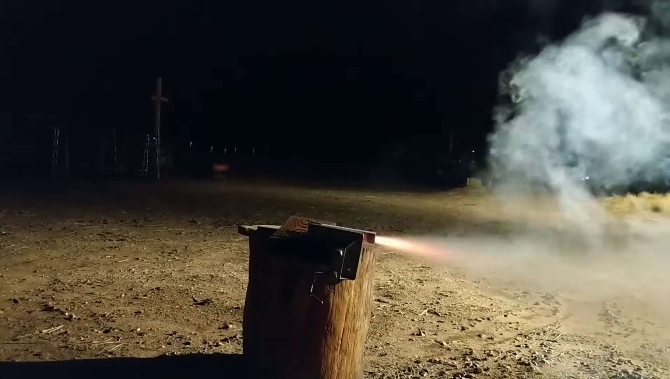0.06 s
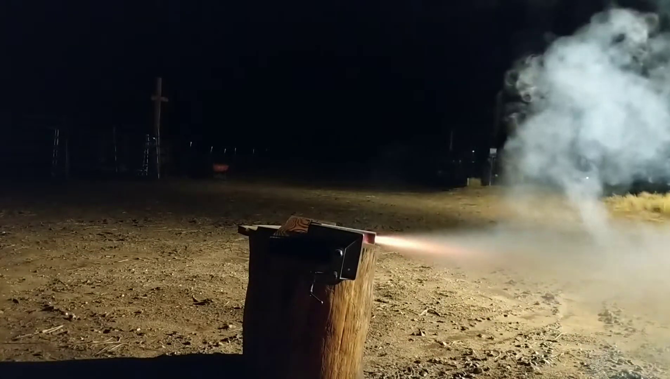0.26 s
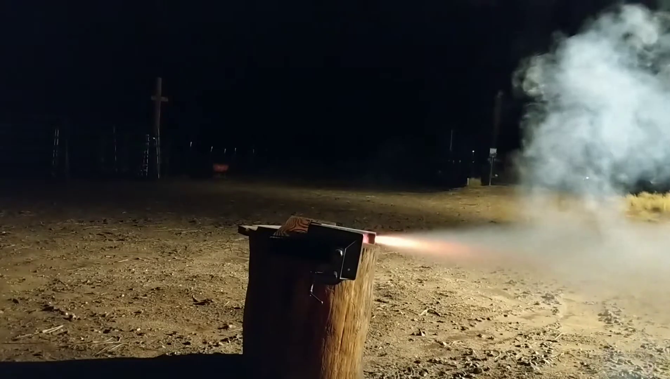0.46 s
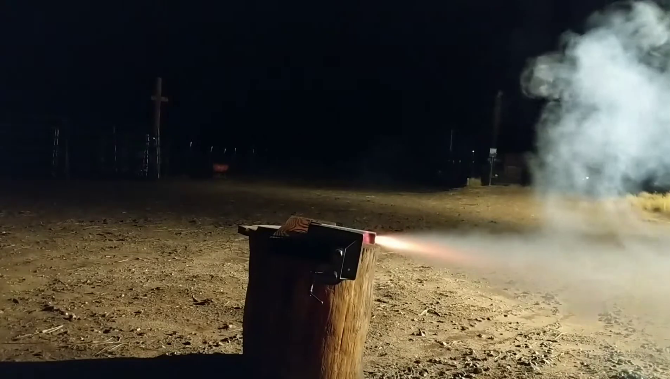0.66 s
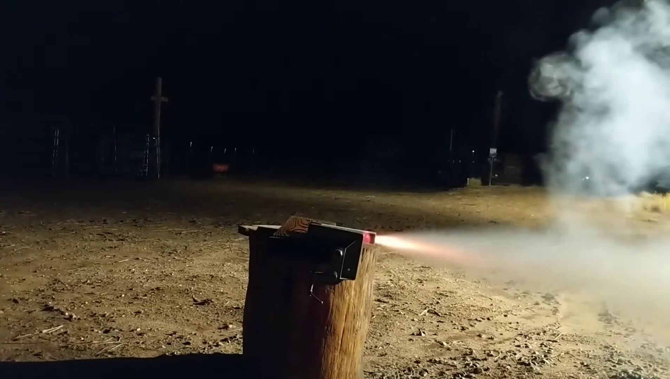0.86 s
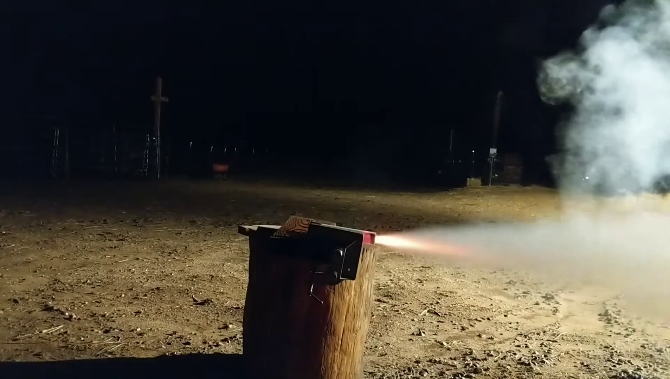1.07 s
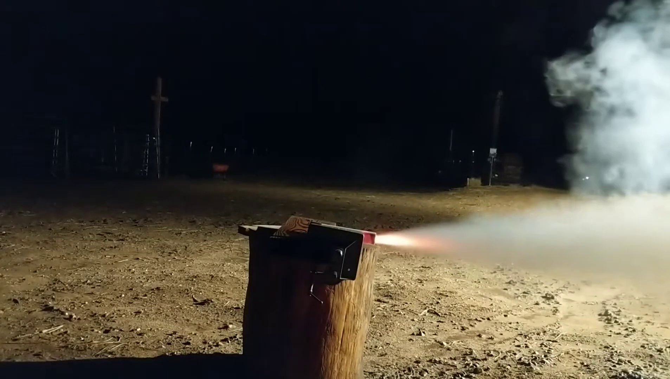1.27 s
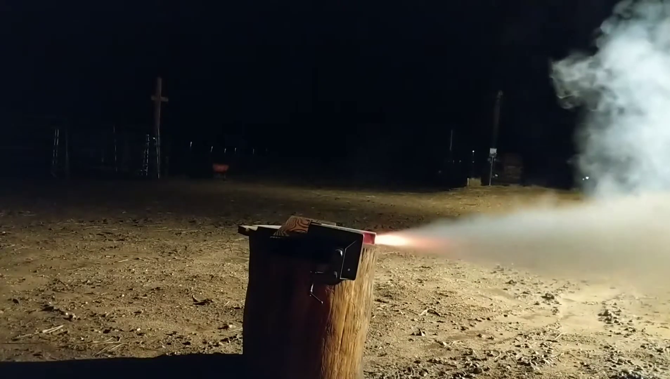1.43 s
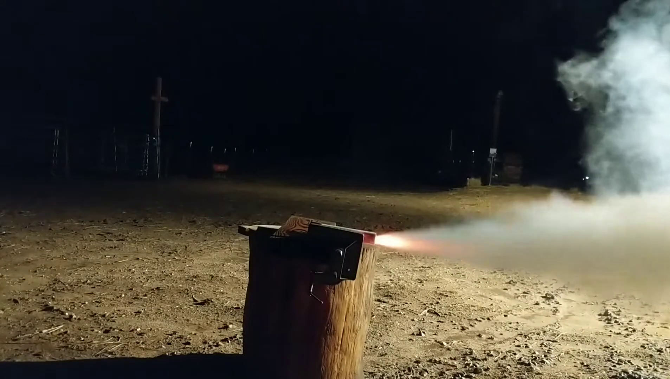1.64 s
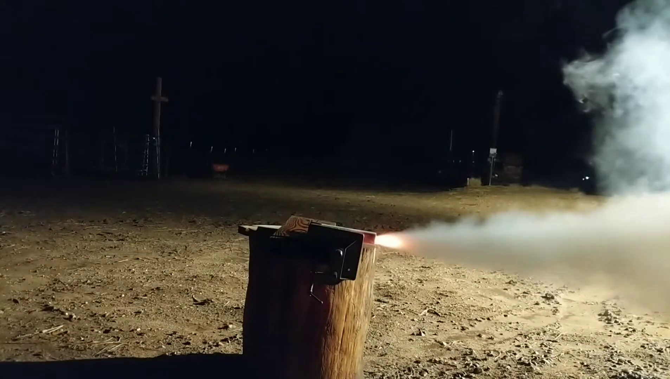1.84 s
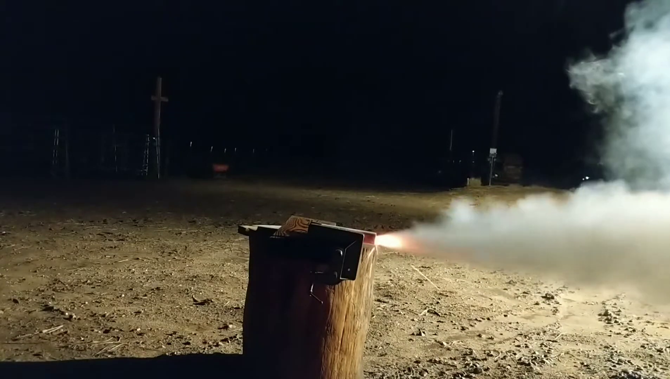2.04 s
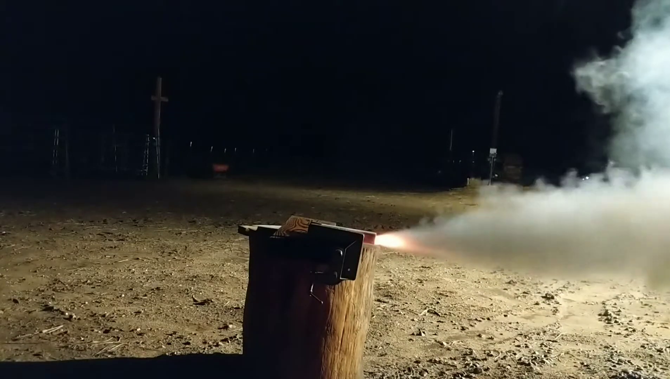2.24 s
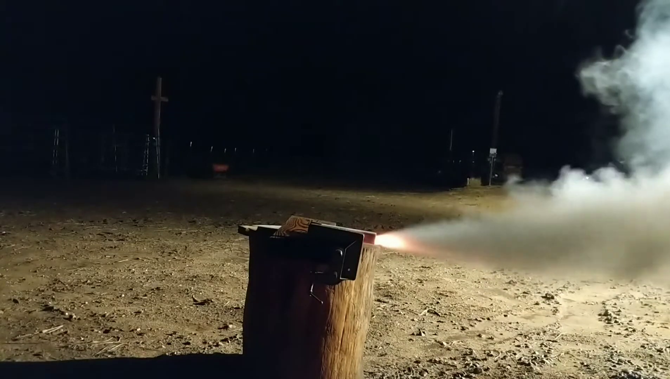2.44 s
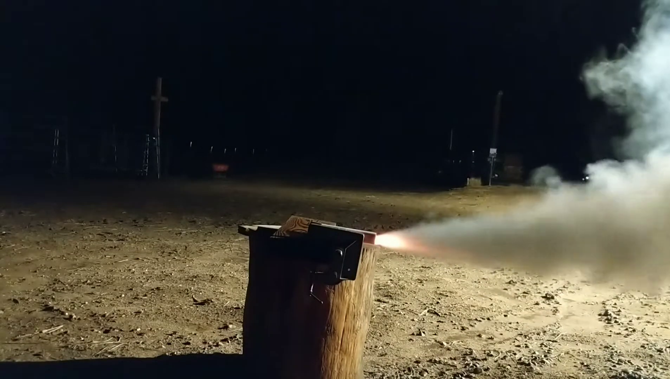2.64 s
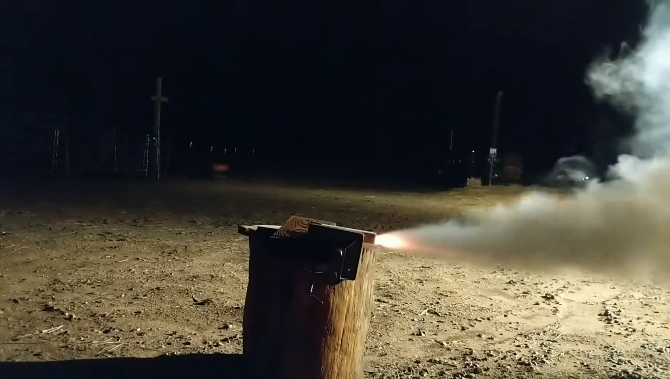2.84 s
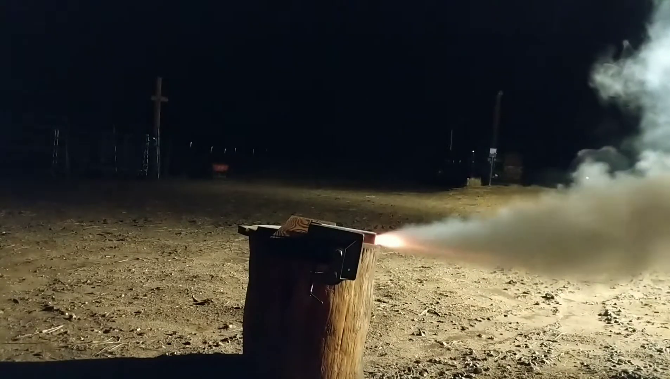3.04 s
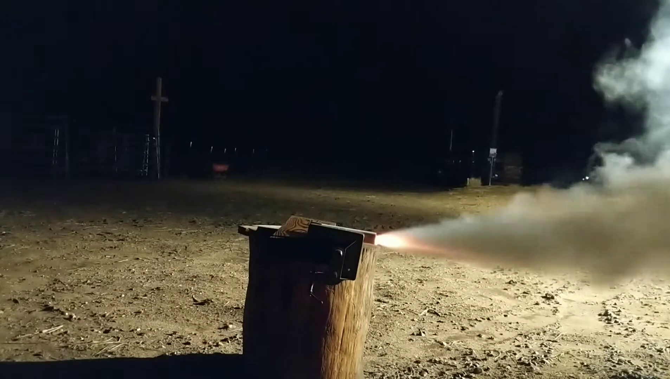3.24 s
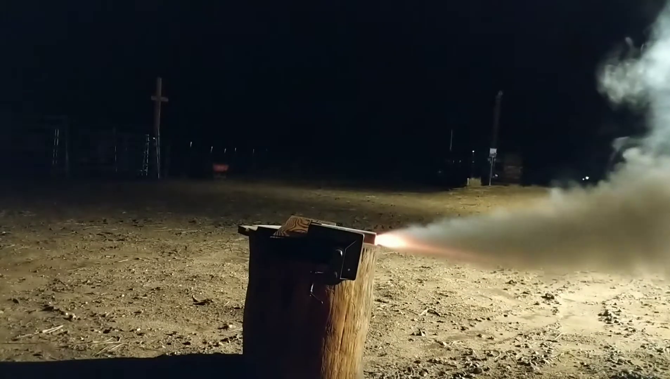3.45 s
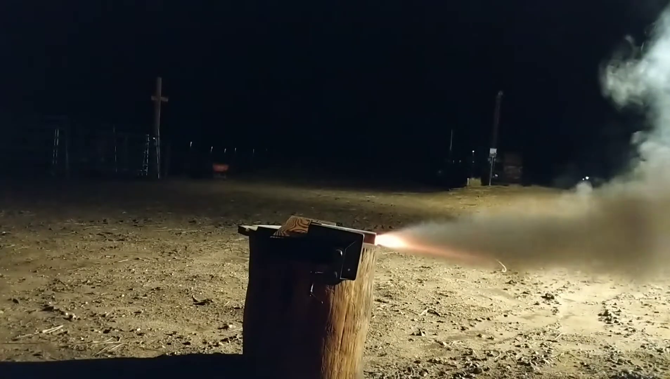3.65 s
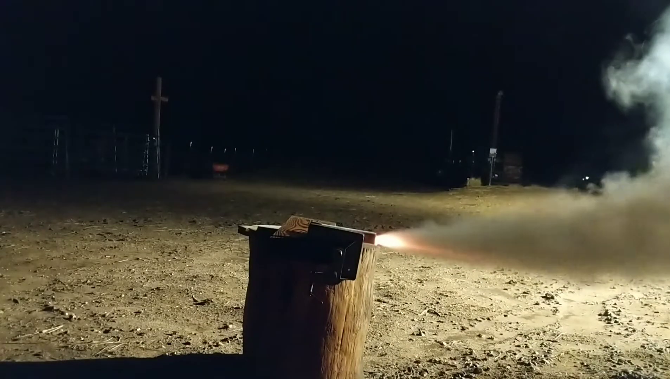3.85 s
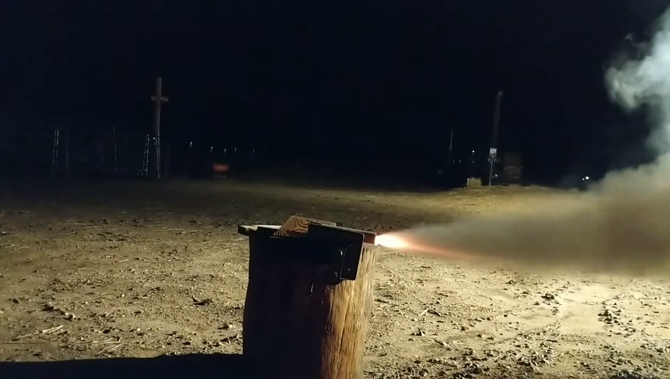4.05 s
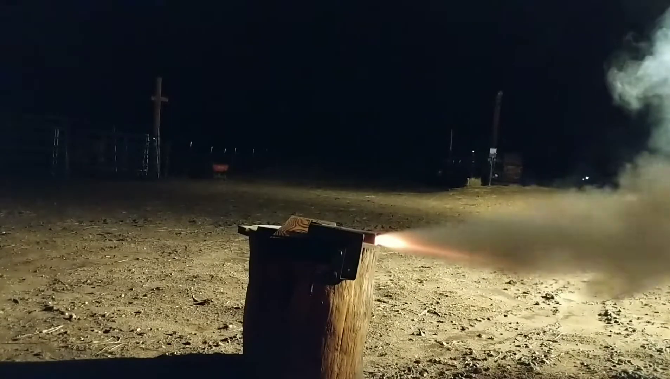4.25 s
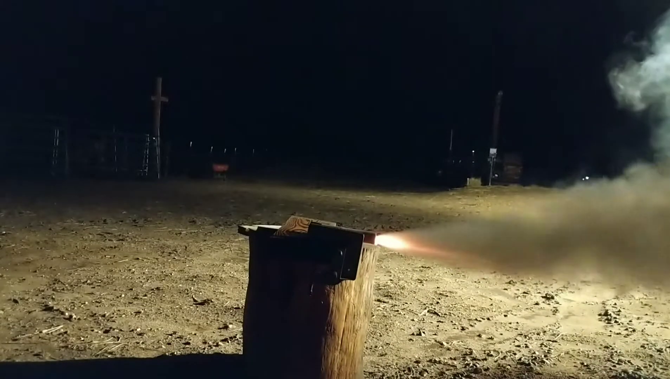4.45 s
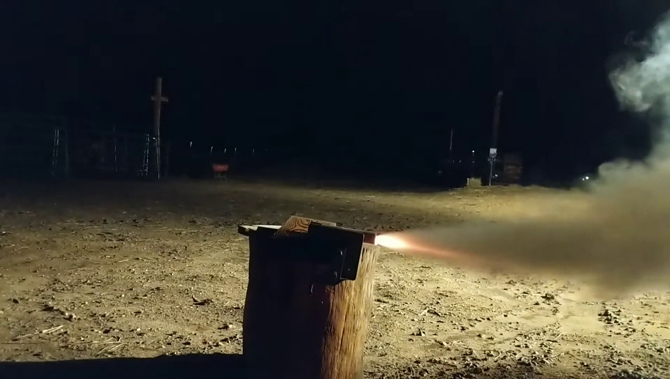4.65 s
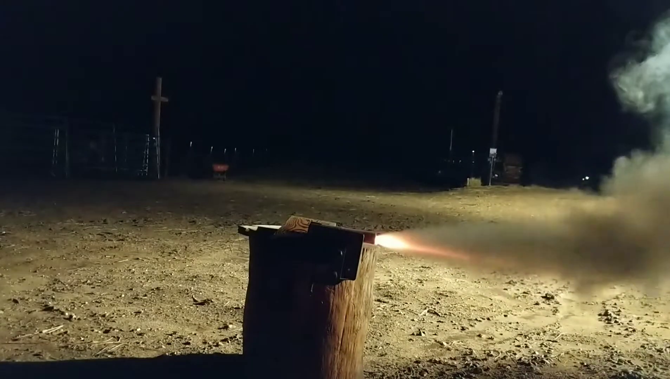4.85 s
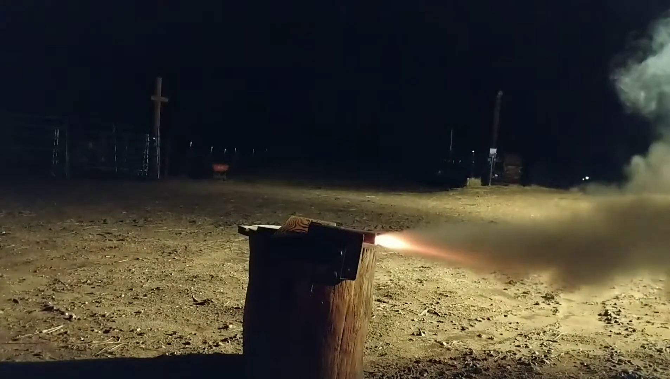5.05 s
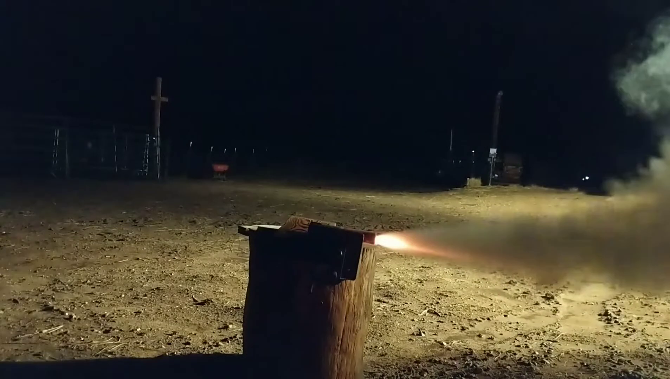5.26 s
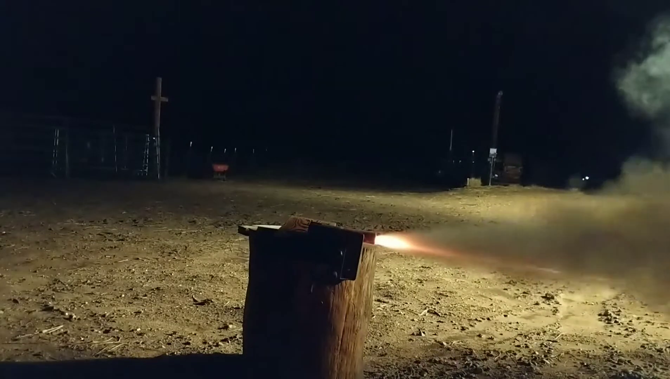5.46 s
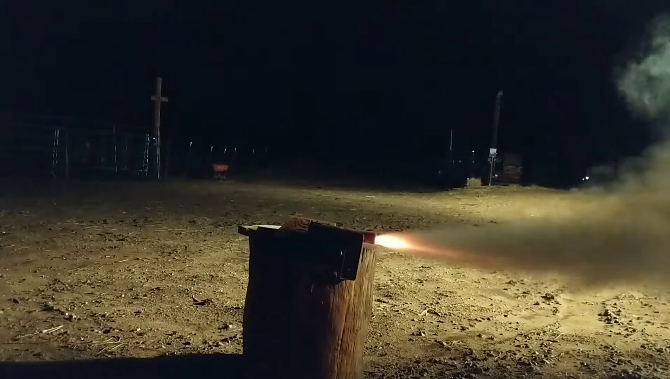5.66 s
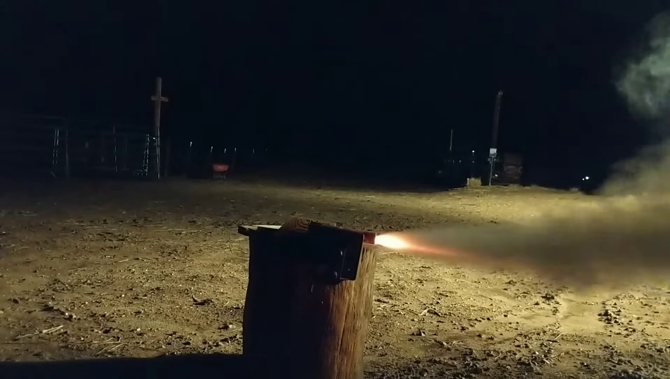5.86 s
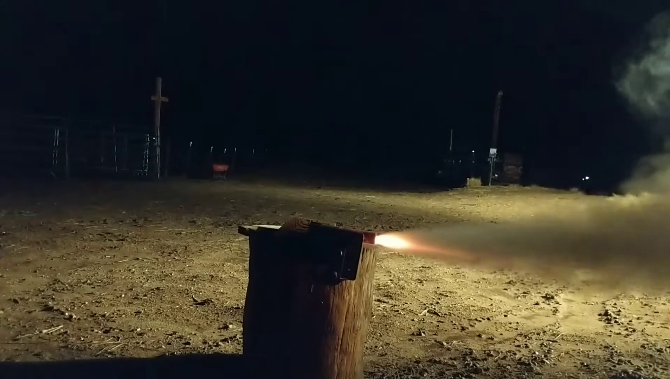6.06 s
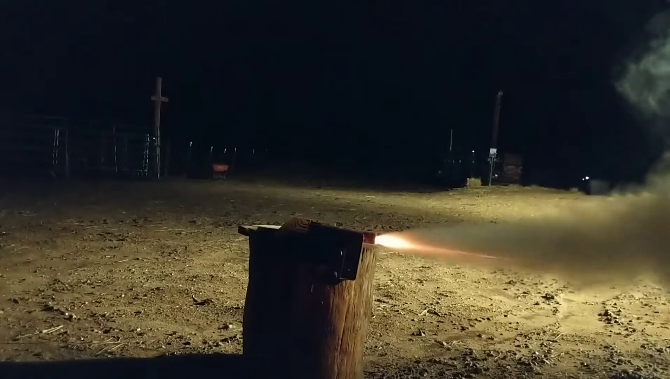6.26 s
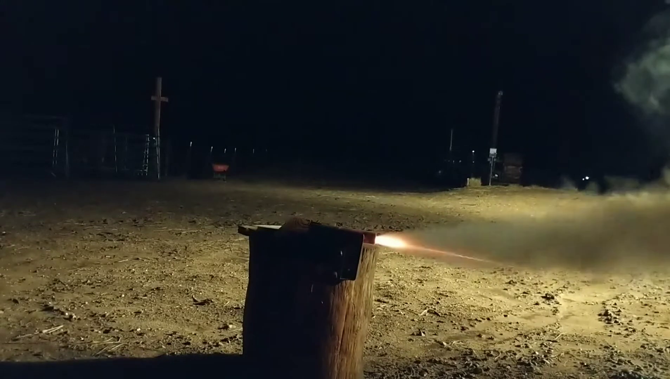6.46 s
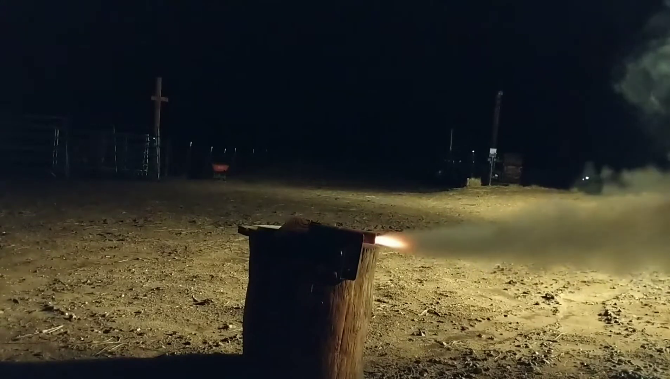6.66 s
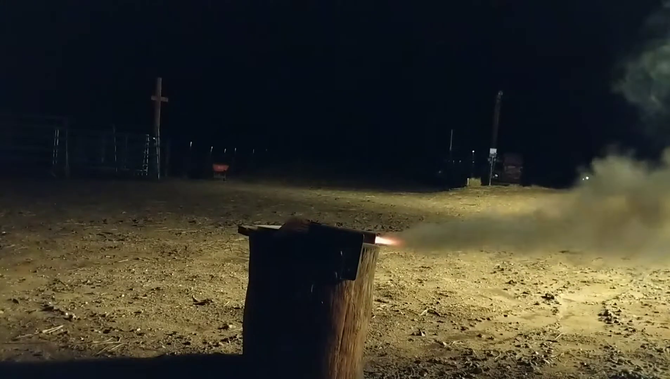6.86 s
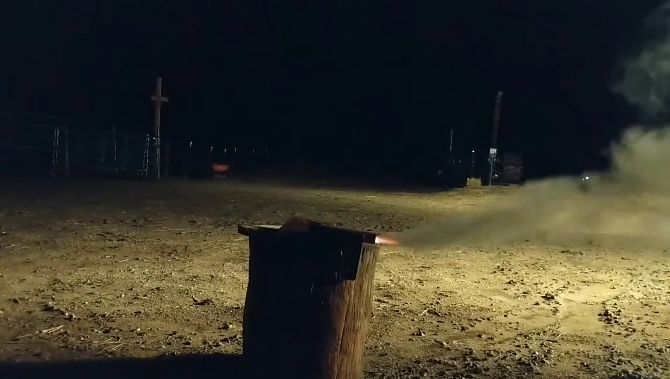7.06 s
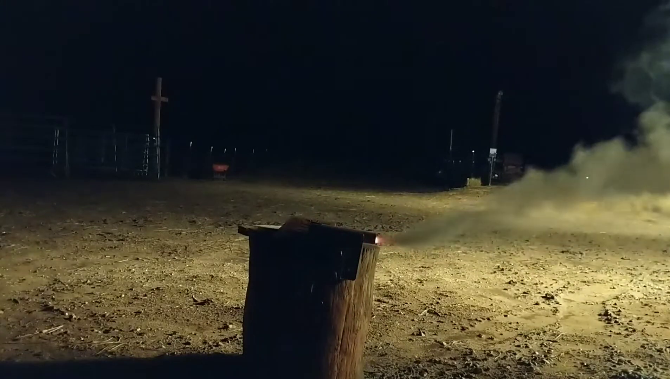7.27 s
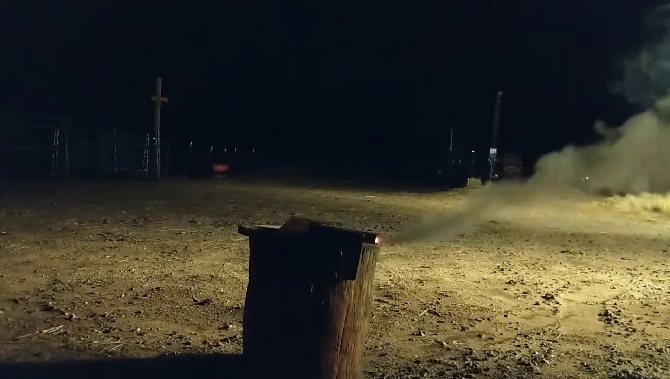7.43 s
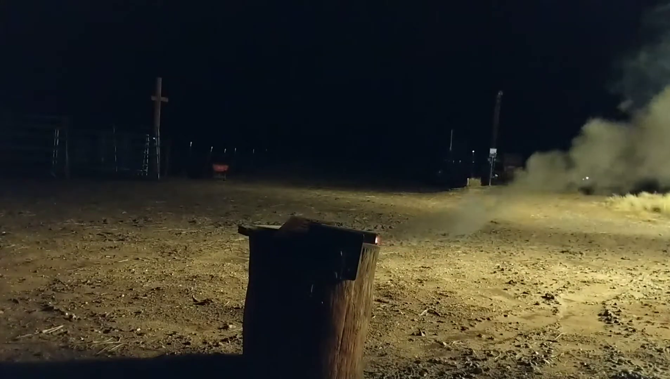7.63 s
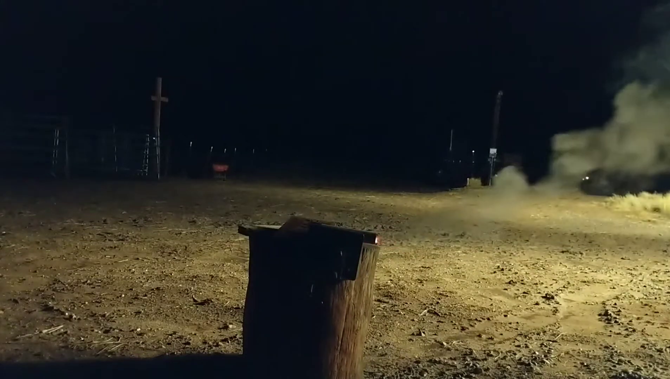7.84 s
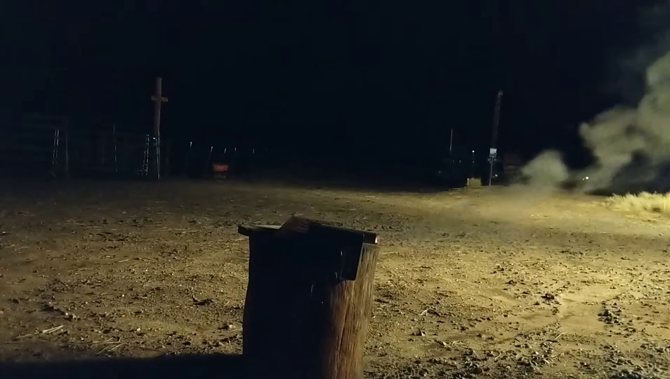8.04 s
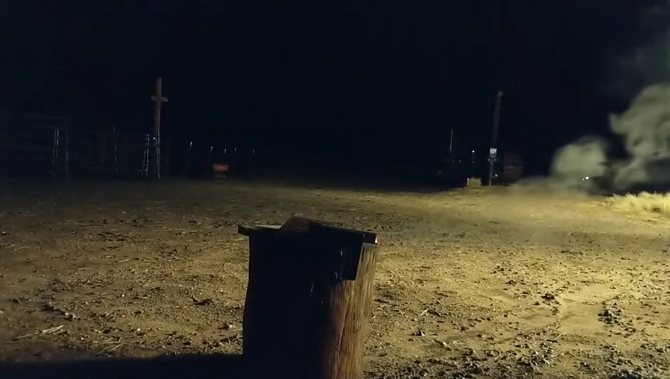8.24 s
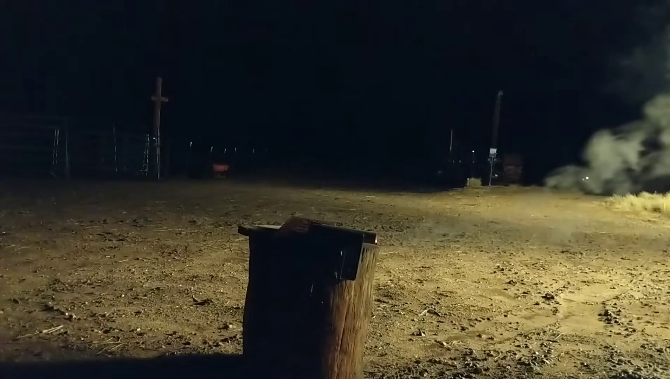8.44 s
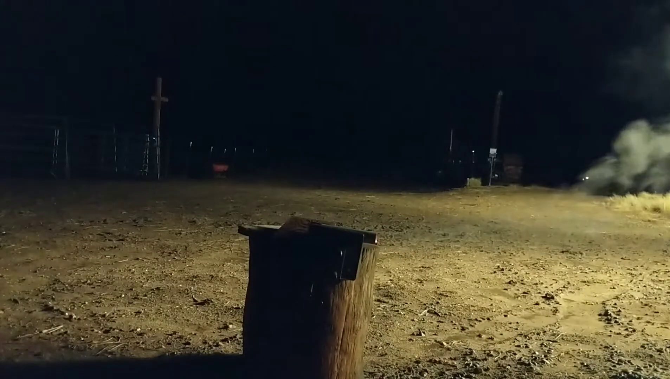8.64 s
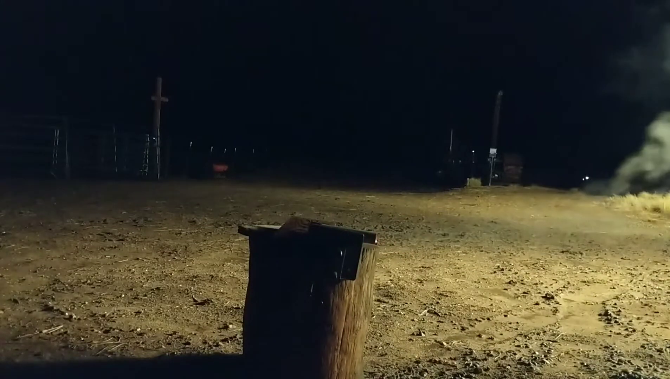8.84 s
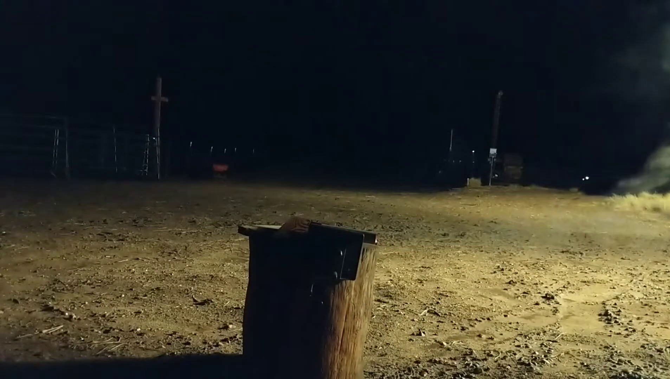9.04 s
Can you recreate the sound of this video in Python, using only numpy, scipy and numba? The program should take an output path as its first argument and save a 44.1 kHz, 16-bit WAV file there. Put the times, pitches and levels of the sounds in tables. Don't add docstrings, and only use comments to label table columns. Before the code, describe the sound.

From 0 s a small solid-fuel rocket motor on a stump blasts at full force: a dense, bright, screaming hiss, nearly overloading the microphone metres away. Between about 0.4 and 1.3 s it chuffs, dipping briefly every tenth of a second or two, and its treble dulls. From 1.3 to 2.4 s the scream falls away into a far quieter, rough turbulent hiss with a hollow, slowly sinking resonance, coloured by short gravel reflections. This stays fairly steady until about 6.3 s; a soft distant boom rolls by around 4.1 s. After 6.3 s the flow weakens quickly, the hiss thinning and its hollow ring dropping in pitch, with a dull tick and small stutters near 7.8-8.2 s. It stops around 8.3 s, leaving a faint wavering low hum, quiet night air and tiny dry crackles near 8.75 s.

```python
import sys
import numpy as np
from scipy import signal
from scipy.fft import rfft, irfft, next_fast_len
from scipy.io import wavfile
from scipy.ndimage import uniform_filter1d, map_coordinates
from numba import njit

SR = 44100
rng = np.random.default_rng(int(sys.argv[2]) if len(sys.argv) > 2 else 0)


def waveform_to_disk(signal):
    frames = np.transpose(np.atleast_2d(signal))
    scaled = np.clip(frames, -1, 1) * 32767
    samples = np.round(scaled).astype(np.int16)
    wavfile.write(sys.argv[1], SR, samples)


def to_linear_factor(level_db):
    exponent = np.asarray(level_db, float) / 20
    return 10 ** exponent


N = 401310
T = np.arange(N) / SR

# f/Hz, level/dB
NIGHT_COLOUR = [(15, -64), (25, -38.5), (75, -10), (122, -12), (151, -5), (203, 0.5), (238, -22.5),
                (304, -15), (397, -19.5), (492, -22.5), (698, -46), (798, -47), (15300, -60)]
# t/s, level/dB, half width/s
YARD_GUSTS = [
    (.05, -39, .15),
    (.3, -30.5, 0.078),
    (.6, -36, .05),
    (.77, -34, 0.032),
]
# t/s, level/dB, half width/s
HUM_SWELLS = [(2.56, -37.5, 0.095), (3.05, -38.5, 0.21), (3.33, -35.5, 0.085), (3.72, -40, 0.1),
              (4.0, -33.5, .09), (5.75, -44, 0.37), (6.15, -44.5, 0.26), (6.55, -40.5, 0.082),
              (7.22, -43, 0.14), (7.44, -36, .07), (7.62, -34.5, 0.036), (8.5, -40.5, 0.15),
              (8.75, -39, 0.079), (9.05, -41, .15)]
# t/s, level/dB, half width/s
DRONE_SWELLS = [
    (3.3, -48, 0.22),
    (4.1, -47, .3),
    (6.3, -49, .3),
    (7.43, -42, 0.095),
    (8.2, -48, 0.36),
    (8.6, -44, 0.31),
    (9.1, -48, 0.18),
]
# f/Hz, width/Hz, level/dB, rise/s, t60/s
BOOM_BANDS = [
    (68, 27, -35.5, .08, 1.9),
    (101, 30, -15.5, .07, 0.54),
    (192, 74, -26, 0.013, 0.74),
    (342, 260, -29.5, .02, 1.23),
    (87, 96, -32.5, 0.044, 2.1),
]
# t/s, level/dB, f/Hz, width/Hz, length/s
RUSTLE_PUFFS = [
    (7.765, -52, 1500, 600, .005),
    (8.733, -56.5, 7600, 1500, 0.0068),
    (8.769, -53, 7210, 1501, .007),
    (8.77, -56, 5000, 2500, 0.0071),
    (8.786, -55, 7400, 2500, .008),
    (8.775, -62, 2600, 1800, .012),
    (8.787, -59, 4500, 3480, 0.0098),
    (8.958, -69, 7200, 2000, 0.0052),
]
# t/s, level/dB, low f/Hz, high f/Hz
WIDE_FLECKS = [(.877, -19, 7500, 9000), (1.016, -25.5, 8900, 11100), (1.411, -23.5, 7400, 8900),
               (1.596, -25, 6200, 10300), (1.805, -25.5, 4100, 7100), (2.293, -36, 6200, 9800),
               (2.943, -36, 4100, 6400), (4.081, -56, 11500, 13300), (4.383, -40, 4500, 9300),
               (4.453, -34.5, 4500, 8600), (5.823, -42.5, 4500, 5700), (7.541, -48.5, 5200, 7600)]
# delay/ms, pressure share/1
GROUND_PATHS = [
    (1.0513, 0.61),
    (1.8, 0.29),
    (.66, 0.091),
    (0.34, 0.096),
    (1.312, 0.074),
]
# t/s, gas flow level/dB, chamber pressure level/dB
SLOW_BURN = [(1.3, -30, -30), (1.6, -27.5, -30), (1.9, -28.5, -33), (2.1, -33, -33), (2.5, -35.5, -32.5),
             (3.5, -35.5, -31.5), (5.0, -35, -34), (6.3, -35.5, -34.5), (6.5, -39.5, -35.5),
             (6.7, -48, -38), (7.1, -55.5, -43), (7.4, -58, -45.5), (7.7, -63.5, -52), (7.9, -68, -59.5),
             (8.0, -69.5, -59.5), (8.3, -69, -62.5)]
# f/Hz, level/dB
PLUME_COLOUR = [(120, -34), (200, -14.5), (249, -16.5), (461, -7), (1210, -8), (1390, -6), (1700, -4.5),
                (2450, -9), (2780, -10.5), (3390, -7), (4700, -9), (6170, -11.5), (7680, -6.5), (8410, -16),
                (15300, -22)]
# t/s, depth/dB, half width/s
PRESSURE_SAGS = [(.37, 1.5, 0.018), (.5, 10, 0.032), (.7, 9, 0.025), (.82, 7, 0.028), (.95, 8.5, 0.021),
                 (1.072, 5.5, 0.022), (1.18, 4.5, 0.017), (1.28, 3.5, 0.016), (7.83, 3.5, 0.022),
                 (7.92, 7.5, 0.021), (8.21, 4.5, .02)]
# t/s, level/dB
JET_LEVEL = [
    (0, -7),
    (.45, -6.5),
    (.75, -6),
    (1.0, -6.5),
    (1.3, -10.5),
    (1.93, -21.5),
    (2.2, -38.5),
    (2.4, -61),
    (2.8, -130),
]
# f/Hz, level/dB
JET_COLOUR = [(18, -53.5), (30, -24), (207, -23), (502, -17.5), (1160, -10.5), (1350, -11), (1670, -9),
              (2400, -11), (3840, -7), (4260, -7), (4610, -6), (6300, -5.5), (7570, 1), (8850, -12),
              (15300, -13.5)]

CROSS_RATIO, THIRD_RATIO = 1.813, 2.6
WARM_S, BURNOUT_S, EMBER_S, FLAME_OUT_S = 2.23, 6.34, 7.28, 8.3
COOL_S, SHARPEN_S = 0.44, 0.4


def unit(x):
    return x / np.sqrt(np.mean(x ** 2))


def curves(table):
    s, *columns = np.transpose(table)
    return [np.interp(T, s, column) for column in columns]


def since(s):
    return np.maximum(T - s, 0)


def bell(s, half_s):
    return np.exp(-((T - s) / half_s) ** 2)


def dying(span_s):
    return 1 - np.exp(-since(BURNOUT_S) / span_s)


def swell(steady_db, rows):
    power = to_linear_factor(2 * steady_db)
    power = power + sum(to_linear_factor(2 * db) * bell(s, half_s) for s, db, half_s in rows)
    return np.sqrt(power)


def walk(rate):
    hold = int(SR / rate)
    steps = np.repeat(rng.standard_normal(N // hold + 1), hold)
    slewed = uniform_filter1d(uniform_filter1d(steps, hold), hold)
    return unit(slewed[:N])


def band(x, hz, kind):
    return signal.sosfilt(signal.butter(4, hz, kind, fs=SR, output="sos"), x)


def coloured(points):
    hz, db = np.transpose(points)
    f = np.maximum(np.fft.rfftfreq(N, 1 / SR), 1)
    colour = to_linear_factor(np.interp(np.log(f), np.log(hz), db))
    return unit(irfft(rfft(rng.standard_normal(N)) * colour, N))


@njit
def svf(x, hz, width):
    y, b, l = np.empty(len(x)), 0., 0.
    for i in range(len(x)):
        g, k = np.tan(np.pi * hz[i] / SR), width[i] / hz[i]
        v = (b + g * (x[i] - l)) / (1 + g * (g + k))
        b, l, y[i] = 2 * v - b, l + 2 * g * v, k * v
    return y


def ring(hz, width_hz):
    hz, width = hz + 0 * T, width_hz + 0 * T
    once = svf(rng.standard_normal(N), hz, width)
    return svf(once, hz, width) * np.sqrt(2 * SR / (np.pi * width))


def yard():
    gusts = swell(-90, YARD_GUSTS)
    hum_gain = np.hypot(swell(-44.5, HUM_SWELLS), gusts * to_linear_factor(-1.5))
    hum = ring(184 + 6 * walk(3), width_hz=54.5) * hum_gain
    drone_gain = np.hypot(swell(-52.5, DRONE_SWELLS), gusts) * to_linear_factor(-2.5)
    drone = unit(band(ring(340, width_hz=300), [270, 600], "band")) * drone_gain
    rumble_gain = np.hypot(to_linear_factor(-52), gusts * to_linear_factor(-6)) * to_linear_factor(1.0)
    rumble = band(ring(100.4, width_hz=94), 45, "high") * rumble_gain
    night = unit(band(coloured(NIGHT_COLOUR), 720, "high")) * to_linear_factor(-59)
    return hum + drone + rumble + night


def boom():
    t = since(4.115)
    out = np.zeros(N)
    for hz, width_hz, db, rise_s, t60_s in BOOM_BANDS:
        out += ring(hz, width_hz) * to_linear_factor(db - 60 * t / t60_s) * (1 - np.exp(-t / rise_s))
    return out


def rustles():
    out = np.zeros(N)
    for s, db, hz, width_hz, length_s in RUSTLE_PUFFS:
        out += ring(hz, width_hz) * to_linear_factor(db) * bell(s, length_s)
    return out


def wide_flecks():
    out, size = np.zeros(N), 2048
    for s, db, low_hz, high_hz in WIDE_FLECKS:
        burst = band(rng.standard_normal(2 * size), [low_hz, high_hz], "band")
        burst = band(burst, [low_hz, high_hz], "band")[-size:]
        start = int(s * SR) - size // 2
        out[start:start + size] = unit(burst) * to_linear_factor(db) * np.hanning(size)
    return out * np.array([[1], [-1]])


def ground(x, sharp, dull_hz, scatter_db):
    size = next_fast_len(N + 4096)
    f = np.fft.rfftfreq(size, 1 / SR)
    dull = sharp / (1 + (f / dull_hz) ** 2)
    echoes = sum(share * np.exp(-2j * np.pi * f * ms / 1000) for ms, share in GROUND_PATHS)
    combed = irfft(rfft(x, size) * (1 + dull * echoes), size)[:N] * to_linear_factor(-1.34)
    lag = 300 + 25 * walk(20)
    scattered = map_coordinates(x, [np.arange(N) - lag], order=3, mode="mirror")
    treble = to_linear_factor(scatter_db) * band(scattered, 4600, "high")
    return combed + treble + to_linear_factor(scatter_db - 11.5) * scattered


def chamber():
    cross_db = curves(SLOW_BURN)[1]
    cold = np.clip((WARM_S - T) / 0.57, 0, 1)
    heat = 1 - (1 - .87) * cold
    burnt, cooled, spent = since(WARM_S), dying(COOL_S), dying(SHARPEN_S)
    share = np.clip(1 - (1 - 0.5) * spent, .2, 2)

    long_hz = heat * (1273 - 24 * burnt) * (1 - (1 - 0.791) * cooled)
    long_db = cross_db + 1.3 + 2 * spent - 4 * cold
    skirt = to_linear_factor(-4) * share * ring(.72 * long_hz, width_hz=720)
    lengthwise = ring(long_hz, 320 * share ** 1.02) + skirt
    lengthwise = lengthwise * to_linear_factor(long_db - 1.0 + 0.69 * walk(14))

    cross_hz = heat * np.maximum(4927 - 225 * burnt - 640 * since(EMBER_S), 3200)
    crosswise = ring(cross_hz, 1200 * share) * to_linear_factor(cross_db)
    grown_db = -9.5 + 2.5 * burnt + 4 * cold
    next_db = cross_db + (1 - spent) * grown_db + spent * 0.7
    upper = ring(CROSS_RATIO * cross_hz, 1250 * share) + to_linear_factor(-.6) * ring(7600, width_hz=950)
    upper = upper * to_linear_factor(next_db - 2.0)
    third = spent * ring(THIRD_RATIO * cross_hz, width_hz=1300) * to_linear_factor(cross_db - 14)
    return lengthwise + crosswise + upper + third


def plume():
    body_db = curves(SLOW_BURN)[0]
    fine_db = -42 + 0.65 * (body_db + 35.5)
    mixing = coloured(PLUME_COLOUR) * to_linear_factor(.5 * walk(30))
    body, fine = unit(band(mixing, 7060, "low")), unit(band(mixing, 7000, "high"))
    thin = signal.lfilter(*signal.butter(1, 4000, "high", fs=SR), body)
    body = body + (to_linear_factor(4.5 * dying(COOL_S)) - 1) * thin
    air = signal.lfilter(*signal.butter(1, 8000, "high", fs=SR), fine)
    fine = fine + (to_linear_factor(-1 * dying(COOL_S)) - 1) * air
    return body * to_linear_factor(body_db + 6) + fine * to_linear_factor(fine_db + 4)


def shock_jet():
    level_db, = curves(JET_LEVEL)
    scream = coloured(JET_COLOUR) * to_linear_factor(level_db + 0.73 * walk(40) + .5 * walk(15))
    bass_db = np.clip(0.6 + 0.1 * (JET_LEVEL[0][1] - level_db), 0, 2)
    bass = signal.lfilter(*signal.butter(1, [500, 3500], "band", fs=SR), scream)
    surge = to_linear_factor(3 * bell(.6, 0.1)) - 1
    screech = signal.lfilter(*signal.iirpeak(7200, 3.0, fs=SR), scream)
    body = scream + (to_linear_factor(bass_db) - 1) * bass + surge * screech
    treble_db = np.maximum(5.5 - 7.5 * T, -3.5)
    return band(body, 8300, "low") + band(body, 8300, "high") * to_linear_factor(treble_db)


def chuffs():
    return to_linear_factor(-sum(db * bell(s, half_s) for s, db, half_s in PRESSURE_SAGS))


def scene():
    background = yard() + boom() + rustles()
    subsonic = np.clip((T - .9) / 0.78, 0, 1)
    alight = np.clip((FLAME_OUT_S + .01 - T) / .045, 0, 1)
    slow = subsonic * alight * (plume() + chamber())
    slow = ground(slow, sharp=1.035, dull_hz=8900, scatter_db=-10)
    fast = ground(band(shock_jet(), 160, "high"), sharp=0.64, dull_hz=9000, scatter_db=-12)
    return np.tile(chuffs() * (fast + slow) + background, (2, 1))


def low_pass(x):
    return signal.sosfilt(signal.butter(12, 15600, fs=SR, output="sos"), x)


def record(dry):
    x = dry - 0.45 * signal.lfilter(*signal.iirpeak(8350, 9.0, fs=SR), dry)
    x = x / (1 + np.abs(x / .86) ** 5.3) ** (1 / 4)
    x = signal.sosfilt(signal.ellip(10, .2, 70, 15460, fs=SR, output="sos"), x)
    return low_pass(x + wide_flecks())


dry = scene()
out = record(dry)
waveform_to_disk(out)
```